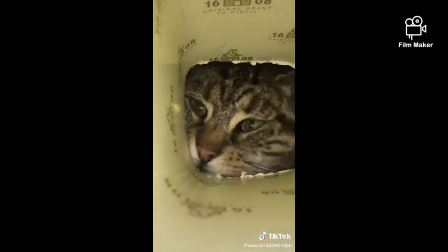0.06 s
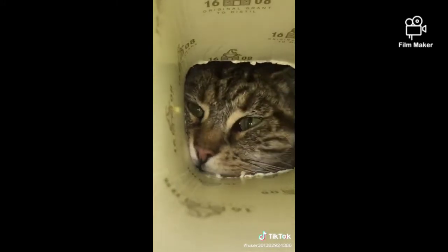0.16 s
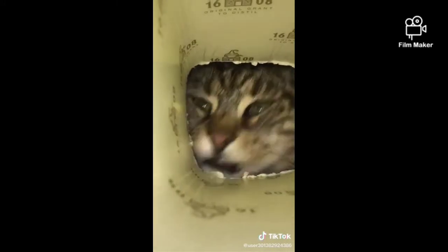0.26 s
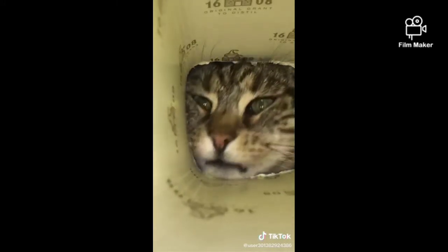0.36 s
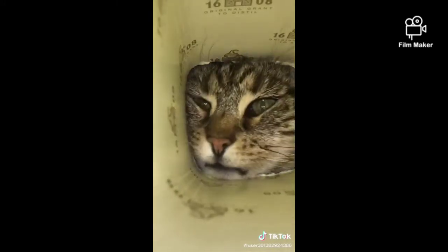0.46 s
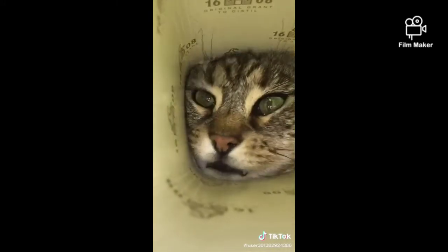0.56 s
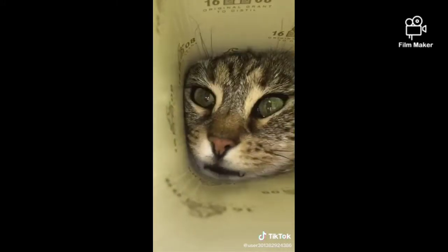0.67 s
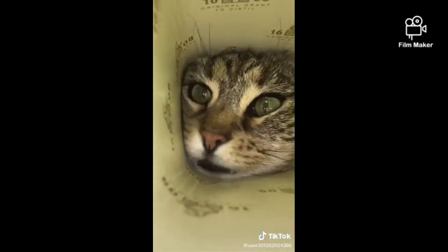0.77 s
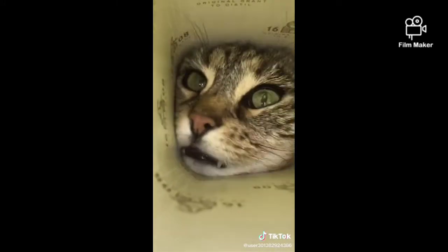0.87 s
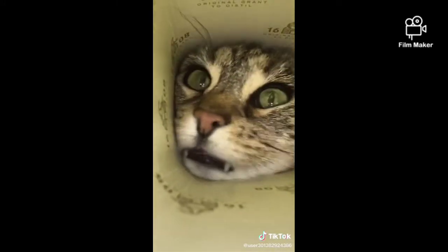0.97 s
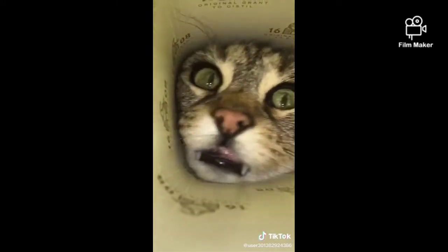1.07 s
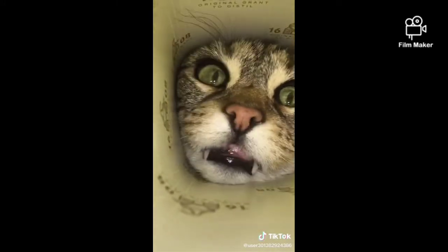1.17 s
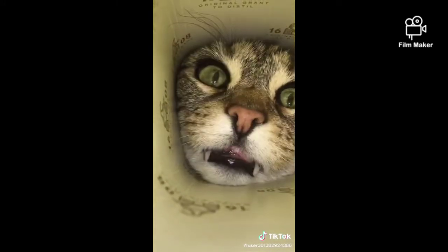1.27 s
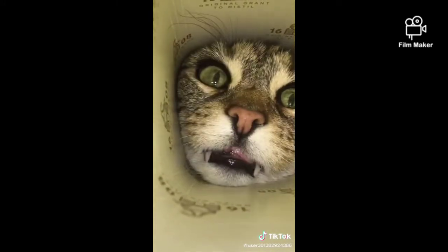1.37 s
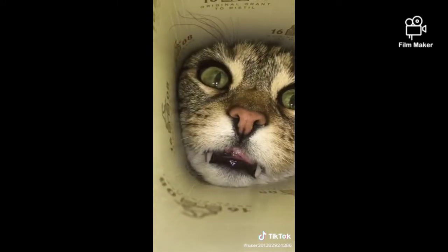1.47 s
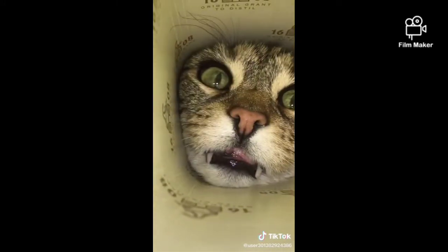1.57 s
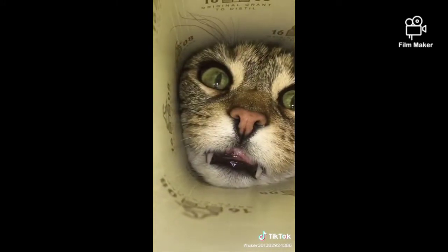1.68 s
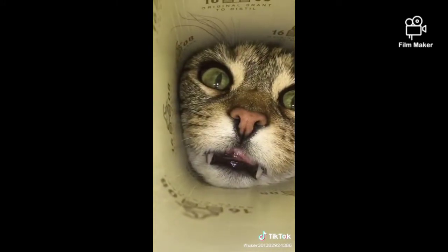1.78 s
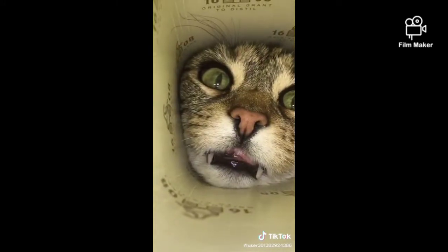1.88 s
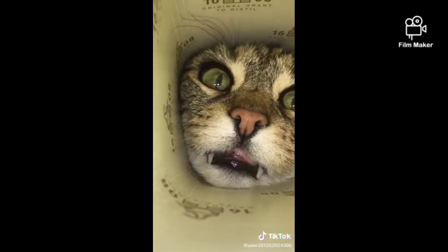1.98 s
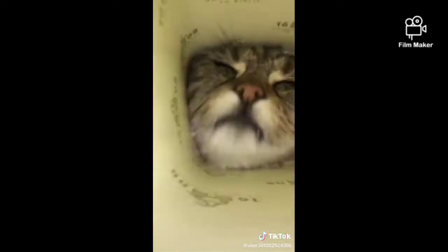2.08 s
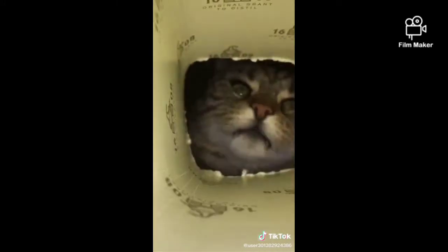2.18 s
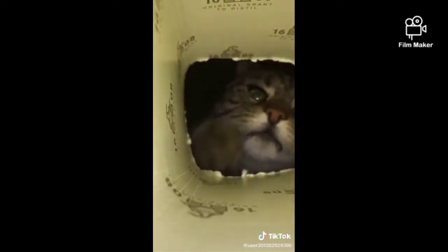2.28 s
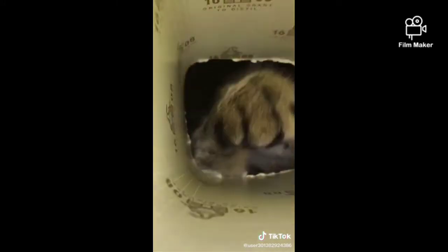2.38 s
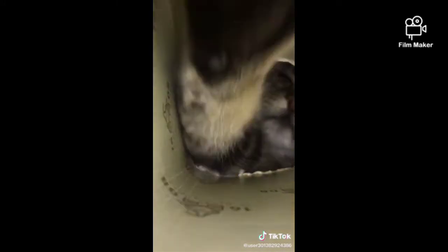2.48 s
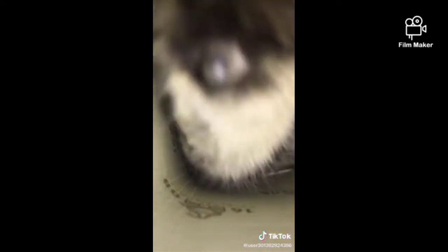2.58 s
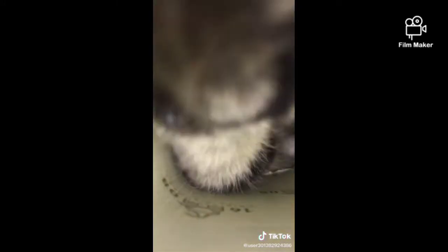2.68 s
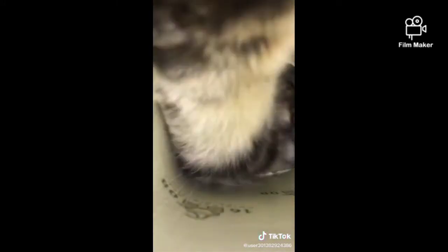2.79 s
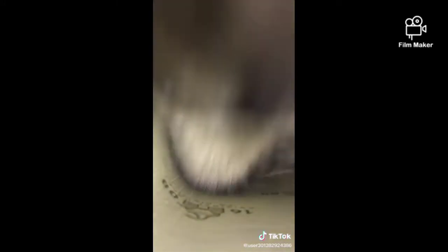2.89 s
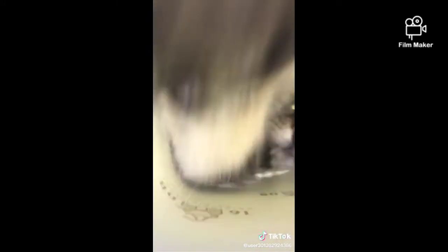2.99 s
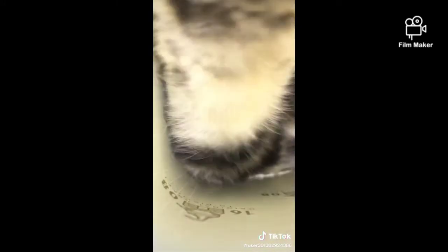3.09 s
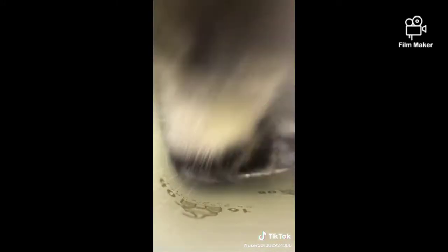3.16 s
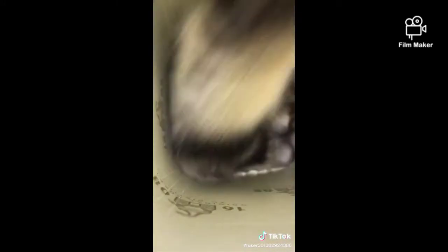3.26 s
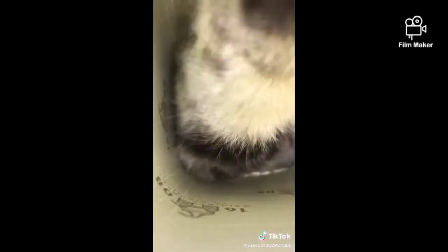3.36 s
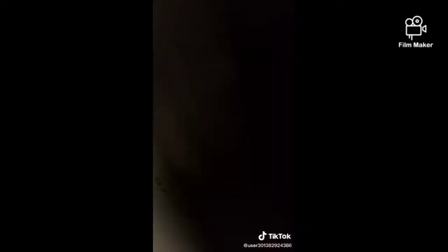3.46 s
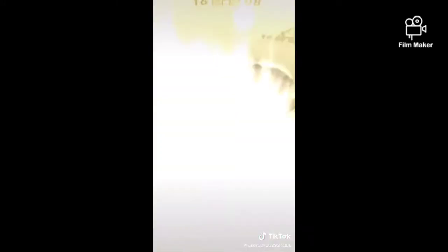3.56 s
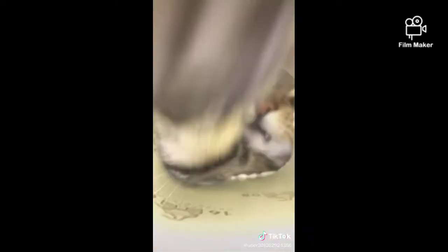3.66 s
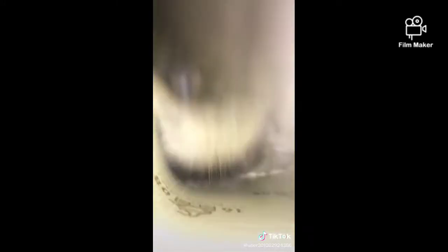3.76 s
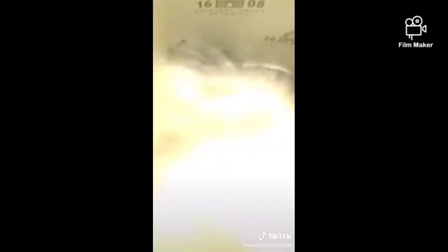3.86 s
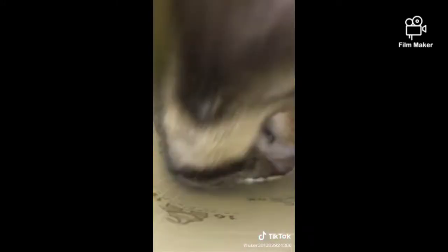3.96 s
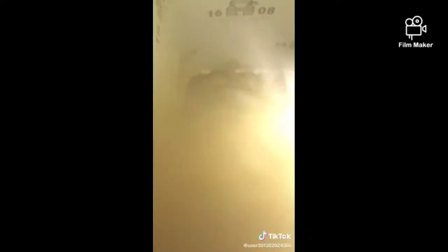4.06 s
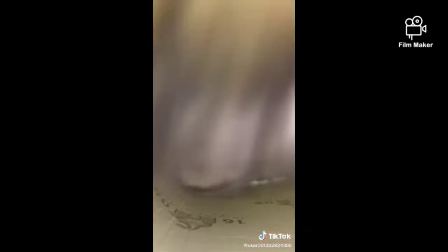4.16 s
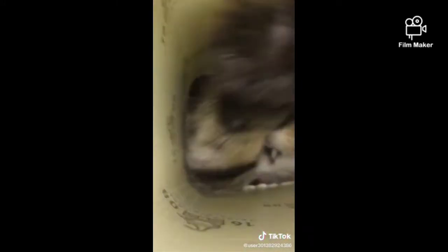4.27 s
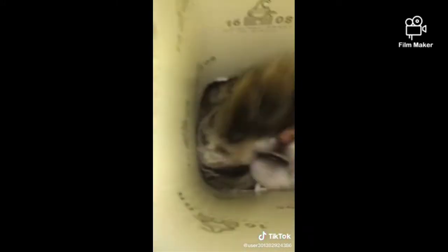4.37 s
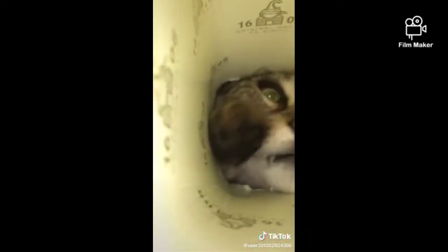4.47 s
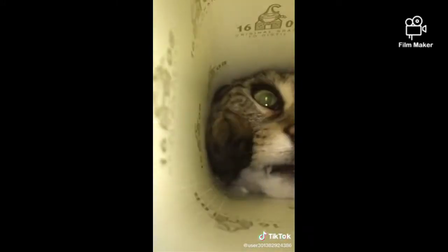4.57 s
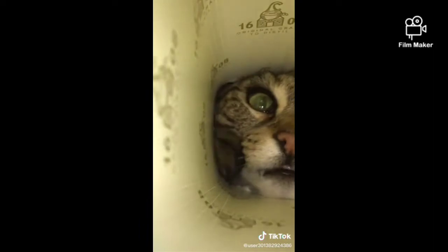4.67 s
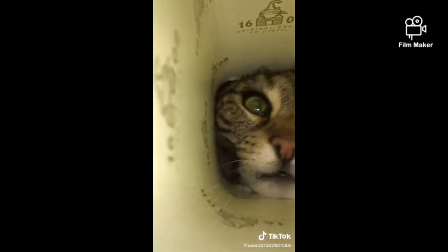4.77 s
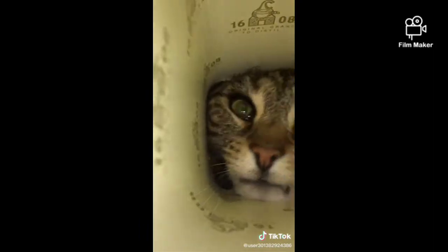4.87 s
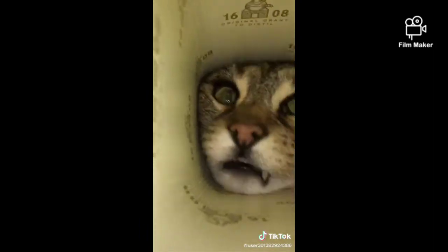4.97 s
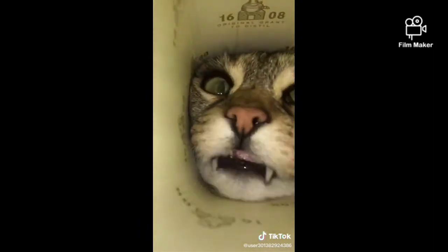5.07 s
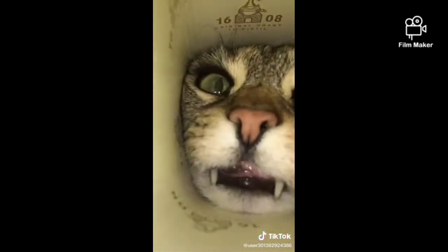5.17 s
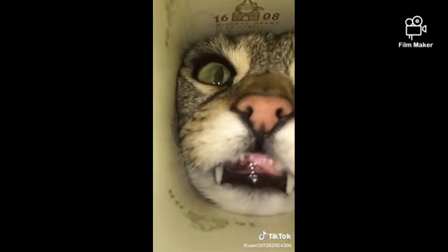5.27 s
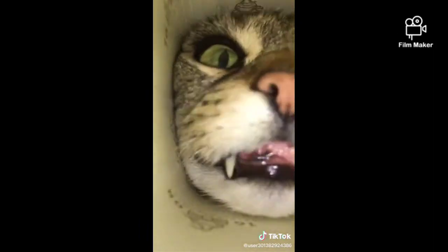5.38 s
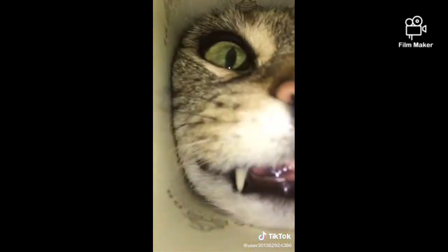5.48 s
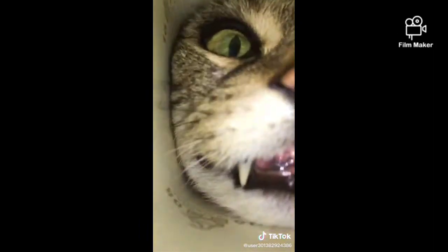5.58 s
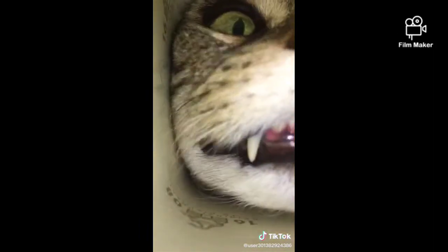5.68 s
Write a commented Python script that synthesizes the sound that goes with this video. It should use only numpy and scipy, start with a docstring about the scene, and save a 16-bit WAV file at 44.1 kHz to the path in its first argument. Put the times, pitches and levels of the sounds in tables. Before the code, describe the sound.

Very close card rasps and soft bumps, a quiet lull, then a violent flurry of claw knocks, scrapes and tearing snags inside a box.

```python
"""Cat at a cardboard box

A cat works at a hole in a cardboard box, close beside a microphone inside it. Its head slides through
the hole early and again near the end: wall flutter, card rasp and fur hiss, all made of tiny clicks.
Between, a paw scrapes and its claws snag in bursts of filtered noise. Knocks and padded bumps ring panel
and air as decaying sines, with claw ticks and low shoves; the hardest overload the microphone.
A faint wavering tone hangs in the lull, over quiet room noise."""
import sys
import numpy as np
from scipy import signal
from scipy.fft import rfft, irfft
from scipy.io import wavfile
from scipy.ndimage import uniform_filter1d

SR = 44100
rng = np.random.default_rng(int(sys.argv[2]) if len(sys.argv) > 2 else 0)


def store_wav(level_fs):
    """Save 16-bit WAV to argv[1]."""
    pcm = np.round(np.clip(np.atleast_2d(level_fs), -1, 1) * 32767)
    wavfile.write(sys.argv[1], SR, pcm.T.astype(np.int16))


N = 253134

# Colours: relative spectra of the sources: hz, level_db
ROOM_COLOUR = [(20, 4), (50, 2), (90, 7), (160, -3), (280, 0), (430, -30), (520, -8), (570, -10),
               (630, -32), (740, -17), (1500, -34), (5000, -41.5), (13000, -53)]
FLUTTER_COLOUR = [(20, -30), (70, -9.5), (140, -10), (235, 0.5), (310, -1.5), (390, -6), (480, -14),
                  (600, -4.5), (720, -17), (900, -25), (1500, -55)]
RASP_COLOUR = [(450, -65), (780, -2), (1050, 3), (1270, 2), (1600, -4.5), (1950, -5), (2230, -0.5),
               (2650, -3.5), (3150, -2.5), (3750, -3), (4400, -3.5), (5100, -14), (7500, -15)]
HISS_COLOUR = [(3000, -68), (4700, -2), (5900, 2), (7000, 1.5), (8700, 2.5), (10500, -0.5), (13000, -2)]
TICK_COLOUR = [(200, -15), (700, -1.5), (1300, 2), (2200, -4), (3000, -6), (5000, -11), (9000, 1),
               (13000, -7)]
ROOM_DB = -50.5  # rms ahead of the microphone

# The cat leans on the box between strokes: time_s, rasp_db (before RASP_TRIM_DB)
LEAN = [(0, -51.5), (0.2, -58), (0.48, -51.5), (1.28, -52), (1.43, -68), (1.6, -70), (1.85, -76.5),
        (2.35, -68), (2.6, -51.5), (3.02, -53), (3.3, -51.5), (3.45, -55.5), (3.7, -52.5), (3.99, -57.5),
        (4.3, -54.5), (5.74, -49)]
# leaning is dull, mostly flutter: both levels relative to the rasp, before the layer trims
LEAN_FLUTTER_DB, LEAN_HISS_DB, LEAN_HZ = 10, -11.5, 1320

# The head slides through the hole: start_s, length_s, rasp_db, change_db (over the slide),
# hiss_db (above rasp), rasp_pitch_hz, flutter_db (above rasp); levels before the layer trims
SLIDES = [(0.274, 0.16, -45.5, -1.5, -8, 2280, 10.5), (0.564, 0.05, -43, 2.5, -10, 2250, 7.5),
          (0.74, 0.025, -46, 1, -9.5, 2000, 3.5), (0.827, 0.4, -39.5, -9, -7, 2000, 9),
          (1.68, 0.068, -66, 0, -22, 940, 13.5), (2.2, 0.1, -68.5, -4, 3.5, 2000, -5),
          (4.336, 0.25, -38.5, -1.5, -12, 1700, 9.5), (4.537, 0.22, -44.5, 5, -6, 2720, 5),
          (4.842, 0.25, -42, 2, -12.5, 1870, 6), (4.942, 0.33, -39.5, -3, -6.5, 2100, 10.5),
          (5.316, 0.25, -42.5, -4, -10.5, 1850, 12), (5.665, 0.08, -45, -2.5, -14, 1800, 13.5)]
# a slide fades in and out gently; the fur hisses most halfway
SLIDE_RISE_DB_PER_S, SLIDE_FALL_DB_PER_S, MID_SLIDE_HISS_DB = 311, 226, 1.5

# Quick scrapes of paw or cheek: start_s, length_s, rasp_db, change_db (over the scrape),
# hiss_db (above rasp), rasp_pitch_hz, flutter_db (above rasp); levels before the layer trims
SCRAPES = [(0.092, 0.057, -48.5, -1, -11.5, 1820, 12), (0.313, 0.028, -27.5, -1, -15.5, 1370, 2.5),
           (2.075, 0.093, -40, 2, -4.5, 2170, 13.5), (2.439, 0.041, -27.5, -1.5, -8.5, 1940, 4),
           (2.487, 0.11, -32, -8, -12.5, 1240, 4.5), (2.674, 0.17, -44.5, -5.5, -7.5, 1580, 5),
           (2.87, 0.1, -28, -5.5, -8.5, 2700, 0), (3.189, 0.063, -37, 1, -8, 1510, 3),
           (3.354, 0.098, -37.5, -10, -10, 1650, 13.5), (3.507, 0.037, -38, 6.5, -1.5, 1900, 11.5),
           (3.56, 0.075, -46.5, 5, -6.5, 2430, 6), (3.746, 0.066, -47, 7.5, -9, 2730, 6.5),
           (3.841, 0.086, -33.5, -4, -10, 1660, 9), (4.045, 0.039, -48.5, -5, -12, 1900, 17),
           (4.092, 0.094, -31, -6.5, -15, 1460, 10.5), (4.484, 0.042, -30, -1.5, -8.5, 1880, 13)]
# a scrape starts and stops abruptly
SCRAPE_RISE_DB_PER_S, SCRAPE_FALL_DB_PER_S = 846, 802
FLUTTER_TRIM_DB, RASP_TRIM_DB, HISS_TRIM_DB = -2.0, -0.32, 2.9

# Claw knocks: time_s, peak_db, panel_pitch_hz, overtone_db, tick_db (above peak), tick_pitch_hz,
# shove_db (of the whole box, above peak); levels before the trims below
KNOCKS = [(0.039, -32, 327, -16, -10, 2550, -23), (2.123, -14, 311, 0, -22.5, 3100, -27),
          (2.4288, 0.5, 353, -9, -18.5, 1180, -22), (2.5471, -3.5, 400, -4, -9, 1980, -36),
          (2.77, -21.5, 382, -23, -11.5, 1260, -24), (2.8039, -6, 368, -16, -14.5, 1700, -23),
          (3.096, -13, 363, -11, -13.5, 1230, -29), (3.1056, -7, 424, -9.5, -14.5, 1940, -35),
          (3.1149, -4.5, 380, -43, -22, 1440, -19.5), (3.187, -22.5, 347, -11, -5.5, 1400, -21),
          (3.222, -17.5, 386, -3, -13, 3480, -10), (3.342, -3, 371, -8.5, -8.5, 2320, -47),
          (3.508, -9, 380, -18, -4.5, 1750, -7), (3.53, -3, 334, -44, -7.5, 2500, -20),
          (3.5407, -5, 228, -15, -21, 2200, -3), (3.793, -22, 616, -1, -6.5, 1450, -10),
          (3.854, 1, 329, -21, -6.5, 1330, -3), (3.8683, -5, 387, 1.5, -10, 1190, -6),
          (4.107, -2.5, 328, -35, -11.5, 2610, -3), (4.181, -24, 293, -21, -16, 1970, -10),
          (4.8356, -19, 540, -21, -17, 2110, -32), (5.58, -6.5, 360, -4.5, -21, 1840, -27)]
# Padded bumps of chin and paw: time_s, peak_db, panel_pitch_hz, shove_db (above peak); before the trims
BUMPS = [(0.147, -15, 259, -23), (0.25, -22, 300, -12.5), (0.403, -13.5, 331, -12.5),
         (0.5756, -17, 237, -21), (0.711, -31, 246, -3), (1.2752, -25.5, 238, 0.5), (1.973, -32.5, 257, -5),
         (2.066, -30, 242, 9), (2.128, -24.5, 322, 14), (2.4393, -14.5, 290, -6), (2.5556, -7, 361, -51),
         (2.751, -22, 342, -9), (2.873, -21.5, 505, -1), (3.948, -23, 265, -26), (4.04, -15, 327, -42),
         (4.151, -15.5, 340, -26), (4.16, -14.5, 293, -30), (4.371, -19, 261, -4.5), (4.39, -10, 226, -28),
         (4.411, -22, 271, -24), (4.429, -21, 263, 1.5), (4.451, -18.5, 240, -31), (4.496, -15.5, 333, -12),
         (4.564, -17, 248, -11), (4.757, -10, 227, -13.5), (4.788, -19.5, 227, -11.5),
         (4.965, -10.5, 245, -12.5), (5.098, -20, 320, -21)]
# fur and pad muffle every bump alike: overtone, tick above peak (both before the trims), tick pitch
BUMP_OVERTONE_DB, BUMP_TICK_DB, BUMP_TICK_HZ = -13.5, -35.5, 1300
KNOCK_TRIM_DB, OVERTONE_TRIM_DB, TICK_TRIM_DB, SHOVE_TRIM_DB = 1.5, 0.5, 20.5, 6
# Modes of the air in the box: hz, level_db (relative to the panel), t60_s
CAVITY = [(171, -22, 0.118), (284.2, -10, 0.056), (368, -15, 0.039), (617, -15.5, 0.02), (963, -21, 0.016),
          (1218, -33, 0.024)]
# the struck panel: lowest mode's t60 in s, overtone as a multiple of the pitch, overtone's t60 in s
PANEL_T60, OVERTONE, OVERTONE_T60 = 0.028, 1.688, 0.024
LEAD_S = .003  # length of the short noise swell leading into each tick, in s

# A claw snags and tears free: peak_time_s, peak_level_db, build_up_s, die_away_s, pitch_hz
SNAGS = [(2.162, -43, 0.0022, 0.0016, 4660), (2.454, -27, 0.00093, 0.03, 2700),
         (2.883, -27.5, 0.027, 0.032, 3480), (3.214, -29, 0.014, 0.013, 3660),
         (3.3425, -22, 0.00049, 0.0012, 2840), (3.3503, -12.5, 0.00087, 0.001, 2400),
         (3.5308, -17.5, 0.0019, 0.00085, 2170), (3.589, -29.5, 0.0013, 0.0027, 2430),
         (3.642, -31.5, 0.0069, 0.0028, 2010), (3.797, -30, 0.0009, 0.0036, 2300),
         (3.843, -16, 0.00068, 0.0044, 1950), (3.8577, -14, 0.0025, 0.00069, 2100),
         (3.879, -29, 0.0005, 0.00074, 4500), (4.083, -27, .0008, 0.0031, 1850),
         (4.1007, -12.5, 0.0021, 0.0018, 2000), (4.96, -23.5, 0.0046, 0.0084, 3150)]

# Likeness of the two channels: hz, likeness (0-1)
LIKENESS = [(20, 1), (3200, 1), (3900, .6), (6000, .52), (13000, .5)]
EDGE_HZ = 13150  # upper band limit


def amp(db):
    """Decibels to gain."""
    return 10 ** (np.asarray(db) / 20)


def unit(x):
    """Scales to an rms of one."""
    return x / np.sqrt(np.mean(x ** 2) + 1e-20)


def read(points, hz):
    """Reads a spectrum table on a log-frequency axis."""
    f, value = np.transpose(points)
    return np.interp(np.log(hz + 1), np.log(f + 1), value)


def add(mix, s, sound):
    """Lays a sound into the mix at time s."""
    part = mix[max(0, round(s * SR)):][:len(sound)]
    part += sound[:len(part)]


def colour(x, points, size=4096):
    """Causal filter with the given spectrum, so that clicks keep their sharp fronts."""
    log_gain = np.log(amp(read(points, abs(np.fft.fftfreq(size, 1 / SR)))))
    minimum_phase = np.exp(np.conj(signal.hilbert(log_gain)))
    taps = np.fft.ifft(minimum_phase).real[:size // 2]
    return signal.oaconvolve(x, taps)[:len(x)]


def wander(rate_hz):
    """Slow random drift of unit rms, with little change faster than the given rate."""
    hz = np.fft.rfftfreq(N, 1 / SR)
    spectrum = rfft(rng.standard_normal(N)) / (1 + (hz / rate_hz) ** 4)
    return unit(irfft(spectrum, N))


def focus(x, hz, octaves, skirt_db):
    """Keeps a bell of frequencies around hz (a number or a curve), at constant power."""
    f, t, z = signal.stft(x, SR, nperseg=256, noverlap=192)
    centre = np.interp(t * SR, np.arange(len(x)), hz * np.ones(len(x)))
    distance = np.log2((f[:, None] + 1) / centre)  # octaves
    bell = np.exp(-.5 * (distance / octaves) ** 2) + amp(skirt_db)
    power = (abs(z) ** 2).mean(1)
    bell /= np.sqrt(power @ bell ** 2 / power.sum())
    return signal.istft(z * bell, SR, nperseg=256, noverlap=192)[1][:len(x)]


def room_tone():
    """The quiet room as heard inside the box: steady coloured noise."""
    return amp(ROOM_DB) * unit(colour(rng.standard_normal(N), ROOM_COLOUR))


def stroke(t, start, length, change_db, rise_db_per_s, fall_db_per_s):
    """Level in dB of one stroke: it rises, runs on while the level drifts, and lets go."""
    run = np.clip((t - start) / length, 0, 1)
    before_s = np.maximum(start - t, 0)
    after_s = np.maximum(t - start - length, 0)
    return change_db * run - rise_db_per_s * before_s - fall_db_per_s * after_s


def friction():
    """Adds all contacts in power: rasp level, flutter and hiss above it, power-weighted mean pitch."""
    t = np.arange(0, N, 64) / SR
    contacts = [(np.interp(t, *np.transpose(LEAN)), LEAN_FLUTTER_DB, LEAN_HISS_DB, LEAN_HZ)]
    for start, length, db, change_db, hiss_db, hz, flutter_db in SLIDES:
        arch = np.sin(np.pi * np.clip((t - start) / length, 0, 1))
        level_db = db + stroke(t, start, length, change_db, SLIDE_RISE_DB_PER_S, SLIDE_FALL_DB_PER_S)
        contacts.append((level_db, flutter_db, hiss_db + MID_SLIDE_HISS_DB * arch, hz))
    for start, length, db, change_db, hiss_db, hz, flutter_db in SCRAPES:
        level_db = db + stroke(t, start, length, change_db, SCRAPE_RISE_DB_PER_S, SCRAPE_FALL_DB_PER_S)
        contacts.append((level_db, flutter_db, hiss_db, hz))
    rasp = flutter = hiss = weighted_pitch = 0
    for db, flutter_db, hiss_db, hz in contacts:
        rasp = rasp + amp(db) ** 2
        flutter = flutter + amp(db + flutter_db) ** 2
        hiss = hiss + amp(db + hiss_db) ** 2
        weighted_pitch = weighted_pitch + amp(db) ** 2 * hz
    rasp_db = 10 * np.log10(rasp)
    flutter_above_db = 10 * np.log10(flutter / rasp)
    hiss_above_db = 10 * np.log10(hiss / rasp)
    curves = rasp_db, flutter_above_db, hiss_above_db, weighted_pitch / rasp
    return [np.interp(np.arange(N) / SR, t, curve) for curve in curves]


def slips(per_s, spread_db):
    """Tiny stick-slip releases of fibres: a train of random clicks of uneven size."""
    size = amp(spread_db * np.minimum(rng.exponential(1, N), 4.5))
    happens = rng.random(N) < per_s / SR
    return unit(size * rng.standard_normal(N) * happens)


def shimmer(x, depth_db, size):
    """The touching spot moves over the card, so patches (frames, bins) of the spectrum come and go."""
    z = signal.stft(x, SR, nperseg=512, noverlap=256)[2]
    patches = uniform_filter1d(rng.standard_normal(z.shape), size[0], axis=1)
    patches = uniform_filter1d(patches, size[1], axis=0)
    patchy = z * amp(depth_db * unit(patches))
    return unit(signal.istft(patchy, SR, nperseg=512, noverlap=256)[1][:len(x)])


def rubbing():
    """Friction on the cut edge: the walls flutter, the card rasps, the fur hisses."""
    level_db, flutter_db, hiss_db, hz = friction()
    grip = amp(level_db + 0.68 * wander(rate_hz=12.5))  # the contact catches and lets go
    flutter = unit(colour(slips(per_s=700, spread_db=-2.5), FLUTTER_COLOUR))
    rasp = shimmer(colour(slips(per_s=9000, spread_db=2.2), RASP_COLOUR), depth_db=1.6, size=(13, 3))
    rasp = focus(rasp, hz, octaves=.9, skirt_db=-18)  # follows the pitch of the contacts
    hiss = shimmer(colour(slips(per_s=14000, spread_db=1.8), HISS_COLOUR), depth_db=3, size=(13, 7))
    layers = flutter * amp(flutter_db + FLUTTER_TRIM_DB)
    layers += rasp * amp(RASP_TRIM_DB)
    layers += hiss * amp(hiss_db + HISS_TRIM_DB)
    return grip * layers


def blows():
    """Claw knocks and padded bumps in one list; the bumps share one dull touch."""
    padded = [(s, db, hz, BUMP_OVERTONE_DB, BUMP_TICK_DB, BUMP_TICK_HZ, shove_db)
              for s, db, hz, shove_db in BUMPS]
    return KNOCKS + padded


def knock(peak_db, hz, overtone_db, swoop, swoop_s=0.00097, swing_s=0.002):
    """A blow flexes the panel, and the air in the box rings on."""
    t = np.arange(SR // 8) / SR
    # short bending waves arrive first: the pitch drops
    bent = t + swoop * swoop_s * (1 - np.exp(-t / swoop_s))
    panel = np.sin(2 * np.pi * hz * bent) * amp(-60 * t / PANEL_T60)
    overtone_fade = amp(overtone_db + OVERTONE_TRIM_DB - 60 * t / OVERTONE_T60)
    panel += np.sin(2 * np.pi * hz * OVERTONE * bent) * overtone_fade
    air = sum(amp(db - 60 * t / t60) * np.sin(2 * np.pi * f * t) for f, db, t60 in CAVITY)
    swing = (1 - np.exp(-t / swing_s)) ** 2.52  # the panel takes a moment to swing
    sound = (panel + air) * swing
    return amp(peak_db + KNOCK_TRIM_DB) * sound / abs(sound).max()


def tick(hz, noise, rise_s=0.00031, t60=0.02, noise_db=-15):
    """A point hit within a short swell and fade of noise; the harder the tip, the higher it reaches."""
    t = np.arange(len(noise)) / SR - LEAD_S
    fade = amp(noise_db - 60 * np.maximum(t, 0) / t60)
    hit = noise * fade * np.exp(np.minimum(t, 0) / rise_s)
    hit[round(LEAD_S * SR)] = 1
    hardness = [(hz / 3, -7), (hz, 0), (hz * 1.21, -7), (hz * 4, -28)]
    sound = colour(colour(hit, TICK_COLOUR), hardness)
    return sound / np.linalg.norm(sound)


def box_echo(x, wet_db, t60, count=28):
    """Quick reflections between the close walls comb the sound."""
    delay = rng.uniform(0.00067, 0.016, count)  # s
    taps = np.zeros(SR // 20)
    taps[(delay * SR).astype(int)] = rng.choice([-1, 1], count) * amp(-60 * delay / t60)
    return x + amp(wet_db) * signal.oaconvolve(x, taps / np.linalg.norm(taps))[:N]


def knocking(shove_hz=64, shove_t60=0.051):
    """Each blow: the panel's ring, a claw's tick, and a low push as the box shifts."""
    t = np.arange(SR // 6) / SR
    body, ticks = np.zeros(N), np.zeros(N)
    rocking = np.sin(2 * np.pi * shove_hz * t) + amp(-0.5) * np.sin(2 * np.pi * 1.766 * shove_hz * t)
    shove = rocking * amp(-60 * t / shove_t60) * (1 - np.exp(-t / 0.0023))
    for s, peak_db, hz, overtone_db, tick_db, tick_hz, shove_db in blows():
        noise = rng.standard_normal(len(t))
        # a bare claw starts shorter waves than a soft pad
        swoop = 2.195 * np.clip((tick_db + 39) / 22, 0, 1)
        add(body, s - .0001, knock(peak_db, hz, overtone_db, swoop))
        add(body, s, amp(peak_db + shove_db + SHOVE_TRIM_DB) * shove)
        add(ticks, s - LEAD_S, amp(peak_db + tick_db + TICK_TRIM_DB) * tick(tick_hz, noise))
    return body + box_echo(ticks, wet_db=-12.5, t60=0.05)


def whine(hz=573, db=-65, start=1.64, end=1.98):
    """A faint thin sine of wavering pitch hangs in the box during the lull."""
    t = np.arange(N) / SR
    swell = np.clip(np.minimum(t - start, end - t) / .05, 0, 1)
    pitch_hz = hz * (1 + 0.0195 * wander(rate_hz=19.4))
    return amp(db) * swell * np.sin(2 * np.pi * np.cumsum(pitch_hz) / SR)


def snagging():
    """A burst of snapping fibres that swells until the claw comes free."""
    t = np.arange(-SR // 10, SR // 6) / SR
    out = np.zeros(N)
    for s, db, rise, fall, hz in SNAGS:
        fibres, sizes = rng.standard_normal((2, len(t)))
        steady = np.clip((rise + fall) / 0.022, 0, 1)  # a long drag has a narrower pitch
        octaves, skirt_db = .62 - .4 * steady, -20 - 10 * steady
        grit = amp(2 * unit(uniform_filter1d(sizes, size=60)))
        tear = unit(focus(fibres * grit, hz, octaves, skirt_db))
        swell = np.exp(-np.maximum(-t / rise, t / fall) ** 1.1)
        add(out, s + t[0], amp(db) * tear * swell)
    return out


def spread(x):
    """The treble reaches the two channels differently; the bass is common to both."""
    hz, _, z = signal.stft(x, SR, nperseg=256, noverlap=192)
    same = read(LIKENESS, hz)[:, None]
    random_phase = np.exp(2j * np.pi * rng.random(z.shape))
    scatter = random_phase * np.sqrt((1 - same) / (1 + same))
    # doubled, as random phases partly cancel where frames overlap
    side = 2 * signal.istft(z * scatter, SR, nperseg=256, noverlap=192)[1][:N]
    return np.array([x + side, x - side])


def scene():
    """The cat at the box, over a quiet room, in two channels."""
    return spread(room_tone() + rubbing() + knocking() + whine() + snagging())


def record(dry):
    """The microphone loses the deepest bass and rounds off the hardest knocks; then the band limit."""
    thinned = signal.sosfilt(signal.butter(2, 42, "high", fs=SR, output="sos"), dry)
    limited = thinned / (1 + thinned ** 6) ** (1 / 6)  # bends near full scale
    band_limit = signal.firwin(401, EDGE_HZ, window=("kaiser", 8), fs=SR)
    return signal.oaconvolve(limited, band_limit[None], "same")


dry = scene()
out = record(dry)
store_wav(out)
```